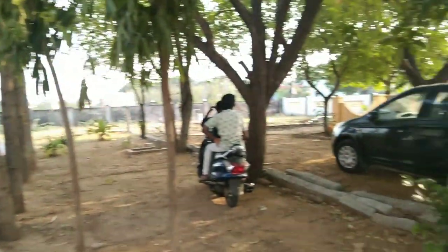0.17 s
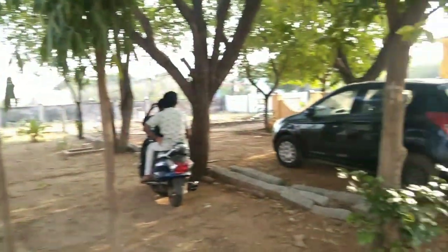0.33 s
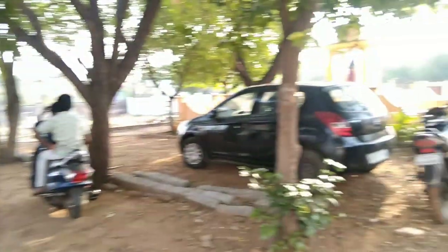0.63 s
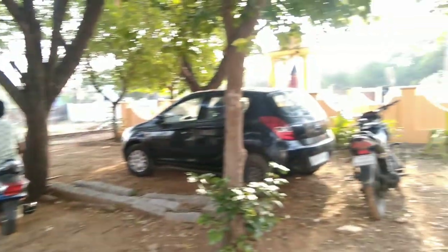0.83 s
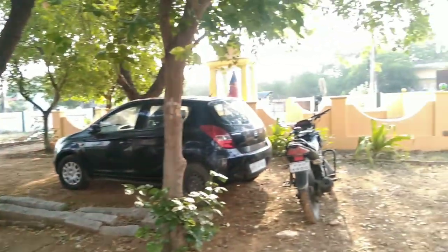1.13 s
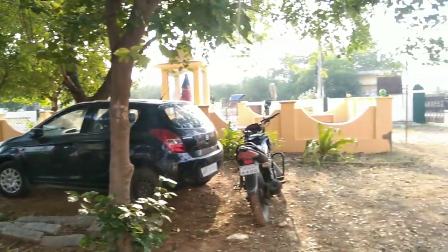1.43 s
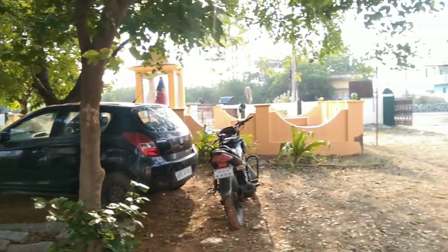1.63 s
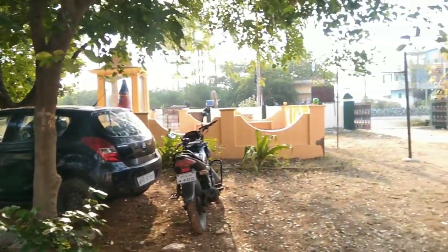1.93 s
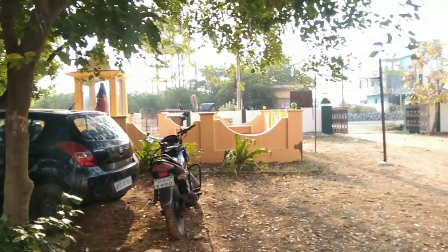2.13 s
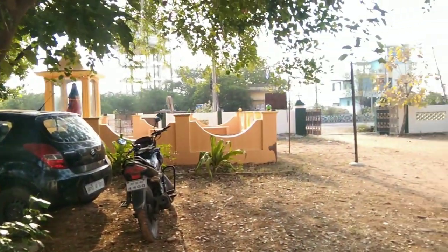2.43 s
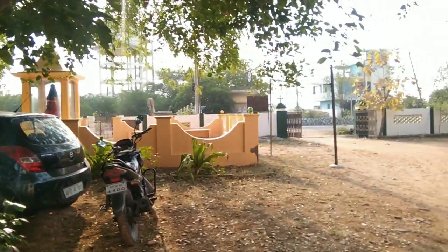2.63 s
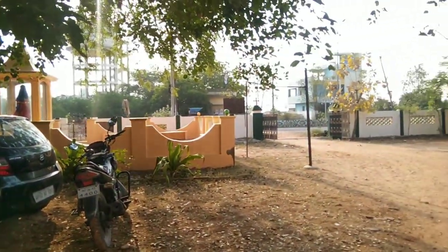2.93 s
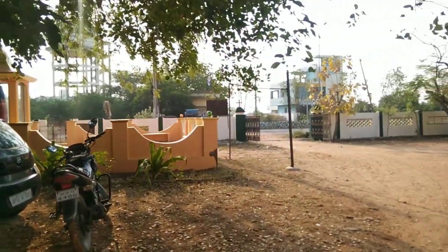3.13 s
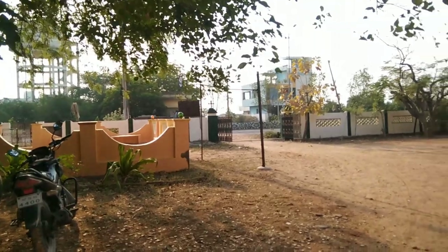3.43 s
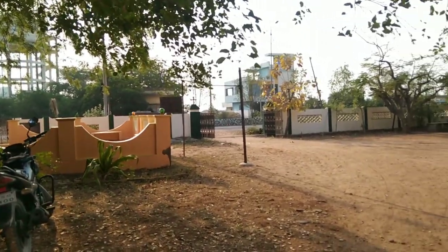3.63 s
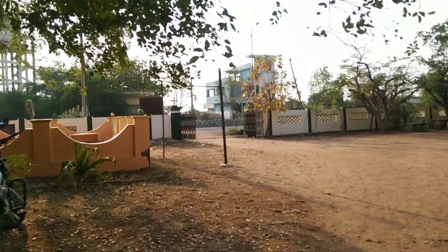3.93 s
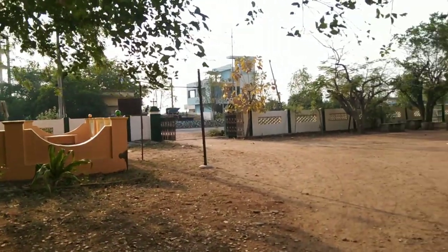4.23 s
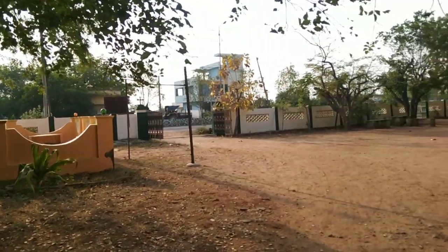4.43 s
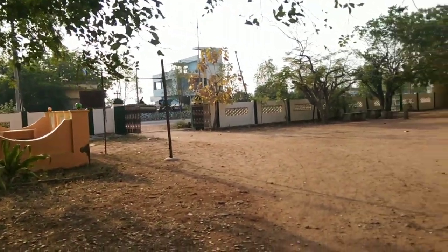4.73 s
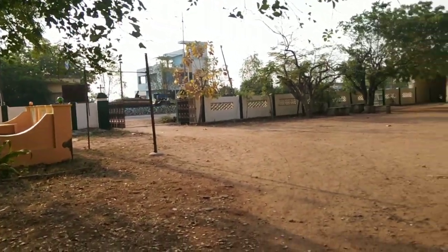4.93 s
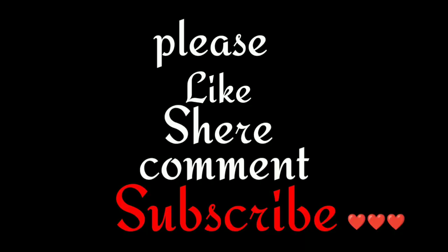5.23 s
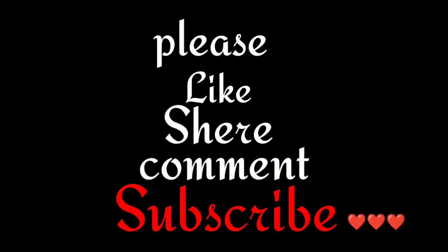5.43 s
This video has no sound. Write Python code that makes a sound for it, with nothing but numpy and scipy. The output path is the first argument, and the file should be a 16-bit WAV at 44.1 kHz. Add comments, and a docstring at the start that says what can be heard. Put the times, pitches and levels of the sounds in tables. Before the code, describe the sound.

Outdoors under trees, a single-cylinder scooter runs near the microphone, its exhaust humming and its engine rattling beneath a shrill chorus of cicadas. It turns raspier as it pulls away, then slackens and dwindles into the distance. Far traffic rumbles throughout, and a second engine rises faintly on the road before the whole sound drops away abruptly.

```python
"""Under trees full of droning cicadas, a single-cylinder scooter rolls away from the microphone.
At first its exhaust hums and its crankcase clatters close by, over the rumble of far traffic.
After a second it pulls: the casing rings and the drive rasps harder, once a turn.
Then the throttle eases and it recedes. Past three seconds another engine rises on the road beyond;
at five, everything fades quickly to silence."""
import sys
import numpy as np
from scipy import signal
from scipy.fft import rfft, irfft, next_fast_len
from scipy.io import wavfile

SR = 44100
rng = np.random.default_rng(int(sys.argv[2]) if len(sys.argv) > 2 else 0)


def digitize_waveform(pressure):
    """Quantize a signal to 16-bit integers and store it at the path in sys.argv[1].

    Rows of a 2-D input are taken as channels; values are limited to [-1, 1].
    """
    field = np.atleast_2d(pressure).T
    bounded = np.clip(field, -1, 1)
    quanta = np.round(bounded * 32767).astype(np.int16)
    wavfile.write(sys.argv[1], SR, quanta)


N = 246017
TIME = np.arange(N) / SR

# Spectra of the far traffic, low rumble and higher whirr: (frequency [Hz], relative level [dB])
RUMBLE_SPECTRUM = [(25, -11), (40, -16.5), (60, -1.5), (100, 1.5), (140, 4.5), (190, 1), (250, -1),
                   (340, -2), (420, -6.5), (500, -5), (660, -14.5), (900, -32)]
WHIRR_SPECTRUM = [(500, -10.5), (660, -14.5), (780, -3), (950, 1), (1100, -3.5), (1350, -7.5), (1600, -1.5),
                  (2000, -3), (2350, 2), (2700, -4), (3200, -4.5), (3800, -5), (4600, -7)]
# One brief tone in the distance: (time [s], half length [s], frequency [Hz], level [dB])
FAR_TONE = (2.83, .045, 463, -46)
# Speed of the engine on the road beyond: (time [s], firing rate [Hz])
ROAD_FIRING_RATE = [(3.38, 28), (3.52, 32), (4.25, 32.7), (4.55, 31), (4.9, 33)]
# Its harmonics: (multiple of the firing rate, relative level [dB])
ROAD_ORDERS = [(4, 2), (5, -.5), (6, -5), (7, -12), (8, -12.5)]

# Cicada chorus in the trees: (time [s], main band level [dB], upper shoulder level [dB])
CHORUS_LEVELS = [(0.0, -25, -32.5), (0.91, -27, -34.5), (1.84, -27.5, -32), (1.99, -29, -34),
                 (3.49, -29, -35), (3.94, -34.5, -39), (4.49, -34.5, -41), (4.87, -32.5, -41),
                 (4.9, -32.5, -41.5)]
# Spectra of those two bands: (frequency [Hz], relative level [dB])
MAIN_BAND_SPECTRUM = [(4200, -28.5), (4600, -19), (4760, -10.5), (5050, -4), (5350, -2), (5650, -4),
                      (6000, -7), (6400, -22.5)]
SHOULDER_SPECTRUM = [(5700, -12), (6100, -1.5), (6400, 2), (7000, -5.5), (7650, -6.5), (8300, -17.5),
                     (9000, -20), (9700, -20.5), (10600, -24.5), (11600, -53.5), (14000, -44)]
# Single insects that stand out: (start [s], end [s], start pitch [Hz], end pitch [Hz], level [dB])
SOLO_CICADAS = [(0, 3.9, 4730, 4725, -48), (0, 3.9, 4795, 4800, -50), (0, 1.9, 6250, 6250, -49),
                (0, 1.5, 6357, 6354, -41), (3.1, 3.3, 5520, 5380, -38), (3.28, 3.75, 5170, 5060, -38.5)]

# The scooter's crankshaft: (time [s], speed [turns/s])
CRANK_SPEED = [(0.0, 52.77), (0.5, 54.05), (1.0, 53.61), (1.5, 53.6), (2.0, 53.45), (2.5, 54.18),
               (2.9, 52.55), (3.4, 51.45), (4.3, 48.7), (4.9, 49.2)]
# Its throttle opens, holds, slackens and closes: (time [s], pull [0-1])
THROTTLE_PULL = [(1.05, 0), (1.42, 0.95), (1.9, 1), (2.08, 0.76), (2.36, 0.77), (2.62, 0.053)]
# The drive rubs harder for a few turns: (time [s], rise [dB])
RASP_SURGES = [(.12, 6), (1.17, 7.5), (1.385, 11), (1.52, 5.5), (1.76, 4.5), (1.84, 8), (2.25, 6)]
# Resonances of drive and engine casing: (frequency [Hz], nominal width [Hz], relative level [dB])
DRIVE_MODES = [(7510, 700, 1.5), (8690, 400, 1), (9760, 800, -0.5), (10820, 600, -6.5), (11830, 660, -8),
               (12500, 350, -17), (14200, 1200, -24.5)]
CASING_MODES = [(887, 190, 1.5), (1300, 400, -13.5), (2320, 150, -5), (2720, 150, -0.5), (3710, 420, -3),
                (4370, 280, 1.5)]
# Spectra of drive and tyre hiss and of valve clatter: (frequency [Hz], relative level [dB])
HISS_SPECTRUM = [(4120, -36.5), (7000, -5), (7680, -5), (8490, -4.5), (9440, -7.5), (10800, -10.5),
                 (12800, -22.5), (15500, -31.5)]
CLATTER_SPECTRUM = [(450, -1), (650, -3), (900, -3), (1200, -0.5), (1500, -3), (2000, 0.5), (2500, -2.5),
                    (3200, -5.5), (4000, -4), (4700, 2)]
# Exhaust note (second order) and throaty third order at the microphone: (time [s], level [dB])
NOTE_LEVEL = [(0.0, -35.5), (0.14, -30.5), (0.86, -42), (0.97, -36), (1.27, -41), (1.35, -33.5),
              (1.92, -31), (2.02, -42), (2.27, -26.5), (2.51, -43), (2.6, -32.5), (2.66, -47.5),
              (3.2, -32.5), (3.44, -40.5), (4.68, -40.5), (4.73, -53), (4.82, -44), (5.0, -47)]
THIRD_ORDER_LEVEL = [(0.0, -41.5), (0.22, -34), (0.43, -34), (0.71, -49), (0.77, -38), (1.05, -45.5),
                     (1.33, -39), (2.07, -42.5), (2.33, -34), (2.7, -51.5)]
# Higher exhaust orders, close by and coasting: (multiple of the crank speed, level [dB])
EXHAUST_OVERTONES = [(4, -45), (5, -50), (6, -49.5), (7, -56), (8, -54)]


def from_db(db):
    """Decibels to gain."""
    return 10 ** (np.asarray(db) / 20)


def rms_one(x):
    """Scale to unit rms."""
    return x / np.sqrt(np.mean(x ** 2) + 1e-20)


def in_time(rows):
    """Each column of a curve, sample by sample."""
    times, *columns = np.transpose(rows)
    return [np.interp(TIME, times, column) for column in columns]


def ramp(start_s, length_s):
    """Rises evenly from 0 to 1."""
    return np.clip((TIME - start_s) / length_s, 0, 1)


def bell(offset, width):
    """A Gaussian swell, 1 at zero offset."""
    return np.exp(-.5 * (offset / width) ** 2)


def drift(rate_hz):
    """Slow random wandering with spread 1."""
    step, settle = 40, 2000   # samples per point; points skipped while the filter settles
    pole = np.exp(-2 * np.pi * step * rate_hz / SR)
    noise = rng.standard_normal(N // step + settle + 2)
    slow = signal.lfilter([1], [1, -2 * pole, pole * pole], noise)[settle:]
    return np.interp(np.arange(N) / step, np.arange(len(slow)), rms_one(slow))


def coloured(spectrum):
    """Noise with the given spectrum, falling 60 dB an octave beyond its ends; rms 1."""
    size = next_fast_len(N)
    octave = np.log2(np.maximum(np.arange(size // 2 + 1) * SR / size, 1))
    hz, db = np.transpose(spectrum)
    outside = np.abs(octave - np.clip(octave, np.log2(hz[0]), np.log2(hz[-1])))
    gain = from_db(np.interp(octave, np.log2(hz), db) - 60 * outside)
    return rms_one(irfft(rfft(rng.standard_normal(size)) * gain, size)[:N])


def resonate(x, hz, width_hz):
    """A resonance with gain 1 at its top."""
    radius = np.exp(-np.pi * width_hz / SR)
    feedback = [1, -2 * radius * np.cos(2 * np.pi * hz / SR), radius ** 2]
    return signal.lfilter(np.array([1, 0, -1]) * (1 - radius ** 2) / 2, feedback, x)


def body(excitation, modes):
    """Steep resonances in parallel, signs alternating; rms 1."""
    rings = 0
    for k, (hz, width, db) in enumerate(modes):
        once = resonate(excitation, hz, 1.3 * width)
        rings += from_db(db) * (-1) ** k * resonate(once, hz, 1.3 * width)
    return rms_one(rings)


def bursts(turns, at, width, uneven_db):
    """One swell per turn, each with its own strength; at and width in turns; rms 1."""
    nearest = np.round(turns - at)
    strength = from_db(uneven_db * np.clip(rng.standard_normal(N), -2, 2))
    return rms_one(strength[nearest.astype(int)] * bell(turns - at - nearest, width))


def partial(turns, multiple, waver_db, waver_hz):
    """One harmonic, wavering in strength and a little in phase; rms 1."""
    phase = 2 * np.pi * (multiple * turns + rng.random()) + waver_db / 10 * drift(waver_hz)
    return rms_one(np.sin(phase) * from_db(waver_db * drift(waver_hz)))


def far_traffic():
    """Farthest off: a low hum sinks early on, traffic rumbles steadily and its whirr slowly grows."""
    hum_db = -41.5 - 10.5 * ramp(start_s=.8, length_s=.4)
    hum = from_db(hum_db) * partial(75.9 * TIME, 1, waver_db=1, waver_hz=5.5)
    rumble = from_db(-38.5 + 1.05 * drift(7.3)) * coloured(RUMBLE_SPECTRUM)
    whirr = from_db(-48 + 1.5549 * TIME) * coloured(WHIRR_SPECTRUM)
    return hum + rumble + whirr


def far_tone():
    """A faint tone comes and goes in the distance."""
    at_s, half_length_s, hz, db = FAR_TONE
    swell = from_db(db) * bell(TIME - at_s, half_length_s)
    return swell * partial(hz * TIME, 1, waver_db=1, waver_hz=17)


def road_engine(peak_s=3.26, peak_db=-34.5, rise_db_per_s=49.5, fall_db_per_s=5):
    """An engine on the road beyond swells, speeds up and slowly recedes."""
    firings = np.cumsum(in_time(ROAD_FIRING_RATE)[0]) / SR
    level_db = peak_db - np.maximum(rise_db_per_s * (peak_s - TIME), fall_db_per_s * (TIME - peak_s))
    orders = sum(from_db(db) * partial(firings, order, waver_db=3.5, waver_hz=7)
                 for order, db in ROAD_ORDERS)
    return from_db(level_db) * rms_one(orders)


def cicada(hz, width_hz):
    """One insect: a thin, unsteady tone around the given pitch; rms 1."""
    phase = 2 * np.pi * np.cumsum(hz) / SR
    return rms_one(drift(width_hz) * np.sin(phase) + drift(width_hz) * np.cos(phase))


def cicada_chorus(near_count=16):
    """Overhead, many buzzing tymbals merge into one band; nearer insects hold tones of their own."""
    buzz = 0
    for tymbal_hz in rng.uniform(35, 320, size=8):
        wavering_hz = tymbal_hz * (1 + .044 * drift(5.3))
        buzz += np.sin(2 * np.pi * np.cumsum(wavering_hz) / SR)
    throb = rms_one(from_db(.6 * rms_one(buzz)))
    near = 0
    for offset in np.linspace(-1, 1, near_count) + rng.normal(0, .03, near_count):
        gain = from_db(2 * drift(2) - 4 * offset ** 2)   # loudest in the middle of the band
        near += gain * cicada(5340 + 330 * offset + 10 * drift(1), width_hz=10)
    main_band = rms_one(coloured(MAIN_BAND_SPECTRUM) + .5 * rms_one(near))
    main_db, shoulder_db = in_time(CHORUS_LEVELS)
    chorus = from_db(main_db + .11) * main_band + from_db(shoulder_db) * coloured(SHOULDER_SPECTRUM)
    for start, end, start_hz, end_hz, db in SOLO_CICADAS:
        singing = np.clip(np.minimum(TIME - start, end - TIME) / .11 + .5, 0, 1)
        pitch_hz = np.interp(TIME, [start, end], [start_hz, end_hz])
        chorus += from_db(db) * singing * cicada(pitch_hz, width_hz=9)
    return throb * chorus


def friction(turns, at, repeat_share):
    """The same rough spot comes round on every turn, mixed with fresh grit."""
    nearest = np.floor(turns - at + .5)
    turn_start = np.interp(nearest + at - .5, turns, np.arange(N))
    samples_into_turn = np.round(np.arange(N) - turn_start).astype(int)
    texture_a, texture_b = rng.standard_normal((2, N))[:, samples_into_turn]
    wear = drift(3)   # the spot slowly changes
    spot = np.cos(wear) * texture_a + np.sin(wear) * texture_b
    return np.sqrt(repeat_share) * spot + np.sqrt(1 - repeat_share) * rng.standard_normal(N)


def drive(turns, pull, away_db):
    """Something dry rubs once a turn, sharply and then trailing off, over drive and tyre hiss."""
    stroke = bursts(turns, at=.205, width=.055, uneven_db=.8)
    trail = .29 * bursts(turns, at=.42, width=.1, uneven_db=7)
    grit = friction(turns, at=.25, repeat_share=.38)
    ring = body((stroke + trail) * grit, DRIVE_MODES)
    surge_db = sum(db * bell(TIME - at_s, width=.042) for at_s, db in RASP_SURGES)
    rasp_db = -47.5 + 8 * pull + surge_db + 2.4 * drift(8)
    rubbing = 1 - ramp(start_s=2.44, length_s=.1)   # stops as the throttle eases
    hiss_db = -45 + 4 * pull - 2.7 * away_db   # distance takes the hiss first
    return rubbing * from_db(rasp_db) * ring + from_db(hiss_db) * coloured(HISS_SPECTRUM)


def crankcase(turns, pull, away_db):
    """Valve gear clatters and the casing rings under load, swelling slightly with every turn."""
    beat = rms_one(1.5 + .31 * bursts(turns, at=.26, width=.11, uneven_db=6))
    clatter = from_db(-38.5 + 1.1 * pull) * beat * coloured(CLATTER_SPECTRUM)
    grit = friction(turns, at=.26, repeat_share=.048)
    casing = from_db(-52 + 13.5 * pull) * body(beat * grit, CASING_MODES)
    return from_db(-away_db) * (clatter + casing)


def exhaust(turns, pull, away_db):
    """The silencer lets through the low orders cleanly; uneven firing blurs the higher ones."""
    note_db, = in_time(NOTE_LEVEL)
    third_db, = in_time(THIRD_ORDER_LEVEL)
    first_db = -45.5 + .4 * (note_db - note_db.mean())   # the octave below partly follows the note
    low = from_db(first_db) * partial(turns, 1, waver_db=3.5, waver_hz=5)
    low += from_db(note_db) * partial(turns, 2, waver_db=.6, waver_hz=5)
    low += from_db(third_db) * partial(turns, 3, waver_db=1.1, waver_hz=5)
    uneven_turns = turns + .035 * drift(5)
    high = sum(from_db(db) * partial(uneven_turns, order, waver_db=2.5, waver_hz=5.7)
               for order, db in EXHAUST_OVERTONES)
    return low + from_db(1.5 * pull - .31 * away_db) * high   # overtones carry farther than clatter


def scene(recede_start_s=2.31, recede_db_per_s=8.1):
    """The scooter leaves the microphone, with cicadas and road behind it, all in the centre."""
    turns = np.cumsum(in_time(CRANK_SPEED)[0]) / SR
    pull, = in_time(THROTTLE_PULL)
    away_db = recede_db_per_s * np.maximum(TIME - recede_start_s, 0)
    scooter = sum(part(turns, pull, away_db) for part in (exhaust, crankcase, drive))
    road = road_engine() + far_traffic() + far_tone()
    mono = scooter + road + cicada_chorus()
    return np.stack([mono, mono])


def record(dry, fade_start_s=4.975, fade_db_per_s=151.5, stopband_hz=16300):
    """The microphone signal fades quickly to silence at the end; the highest treble is cut."""
    fade = from_db(-fade_db_per_s * np.maximum(TIME - fade_start_s, 0))
    gate = 1 - ramp(start_s=5.058, length_s=.003)
    lowpass = signal.cheby2(16, 70, stopband_hz, fs=SR, output="sos")
    return signal.sosfilt(lowpass, dry * fade * gate)


dry = scene()
out = record(dry)
digitize_waveform(out)
```